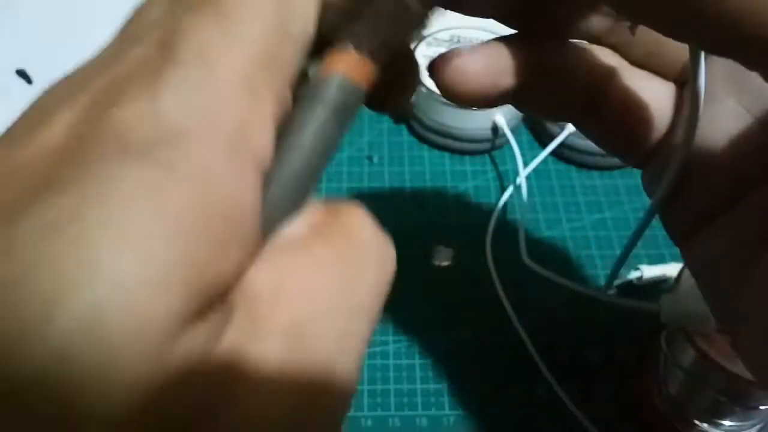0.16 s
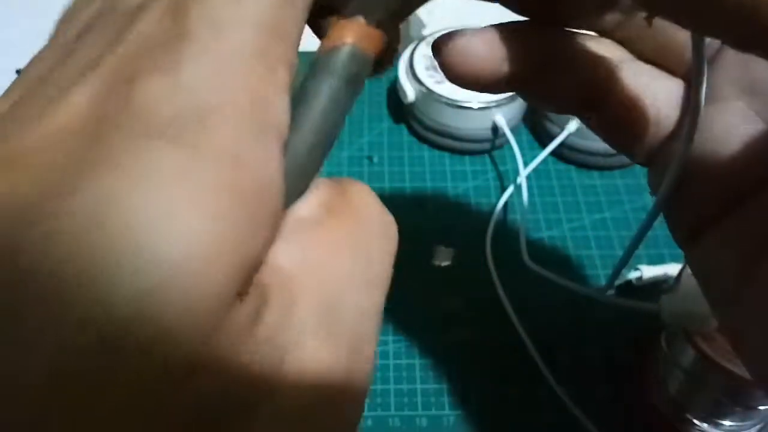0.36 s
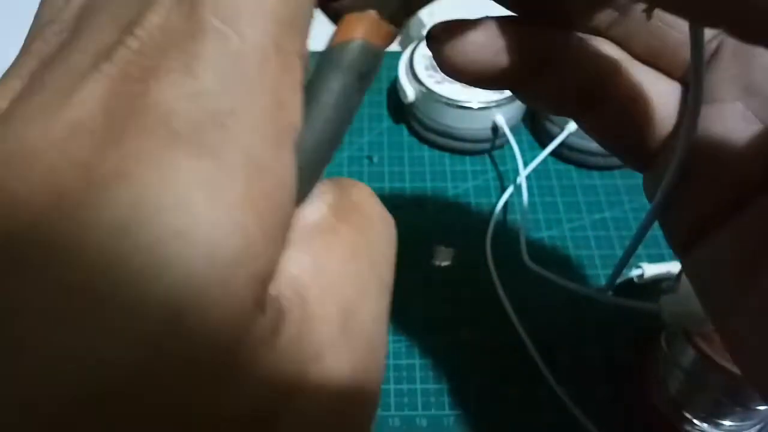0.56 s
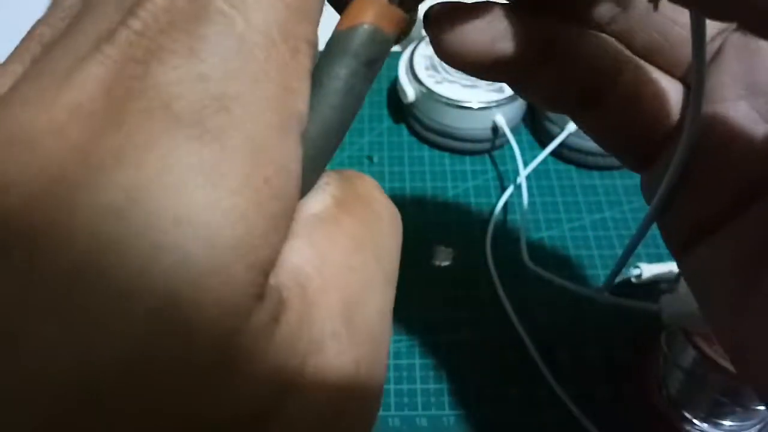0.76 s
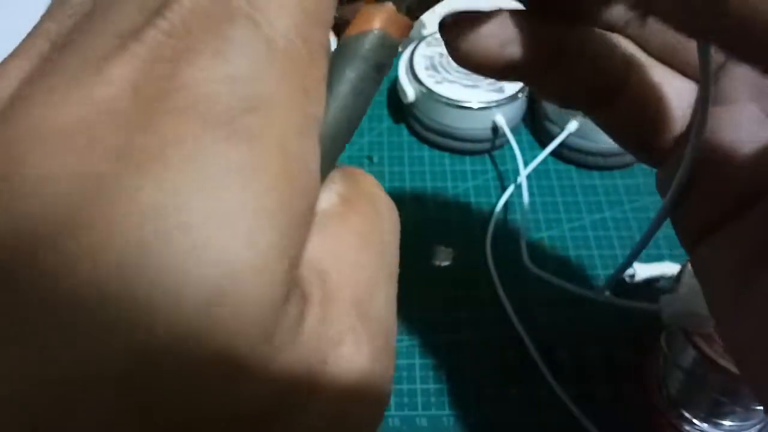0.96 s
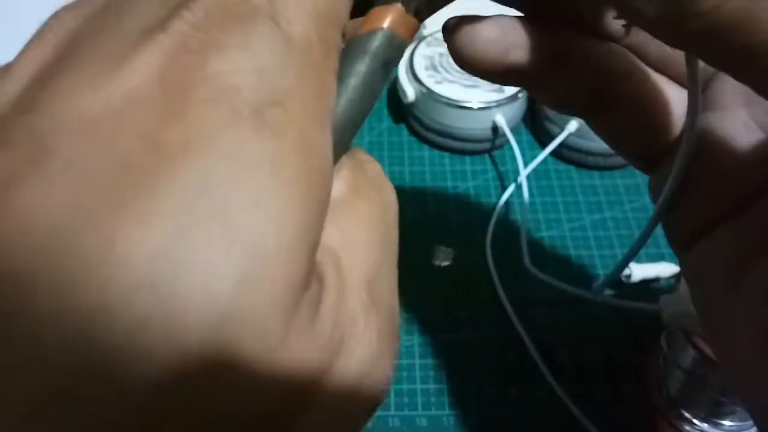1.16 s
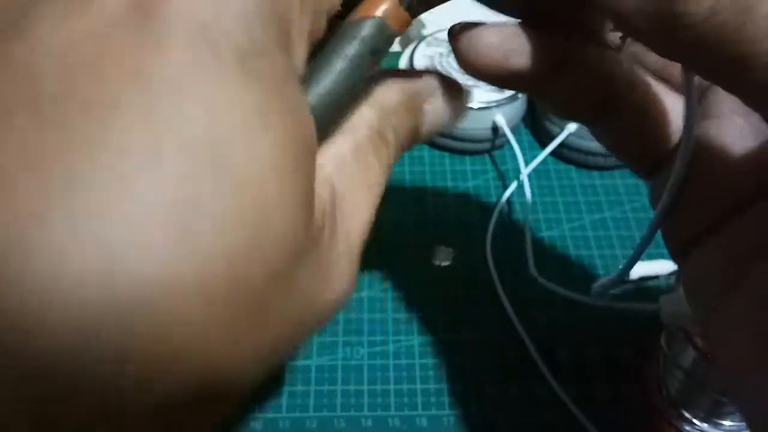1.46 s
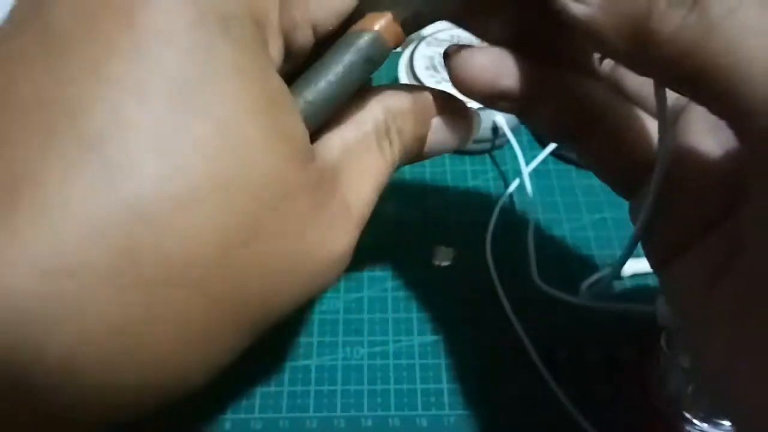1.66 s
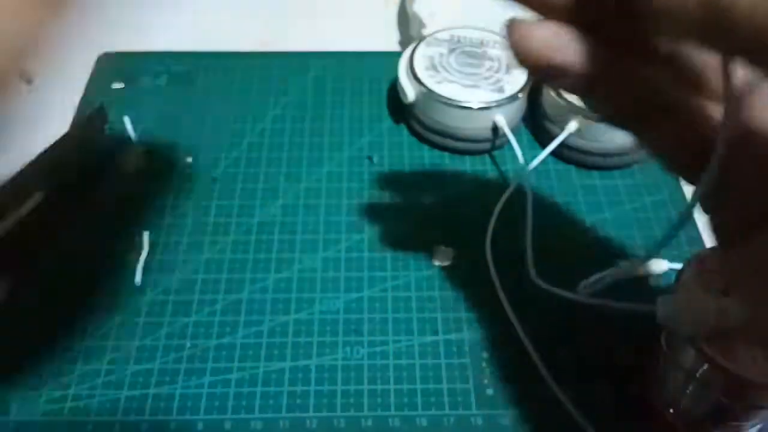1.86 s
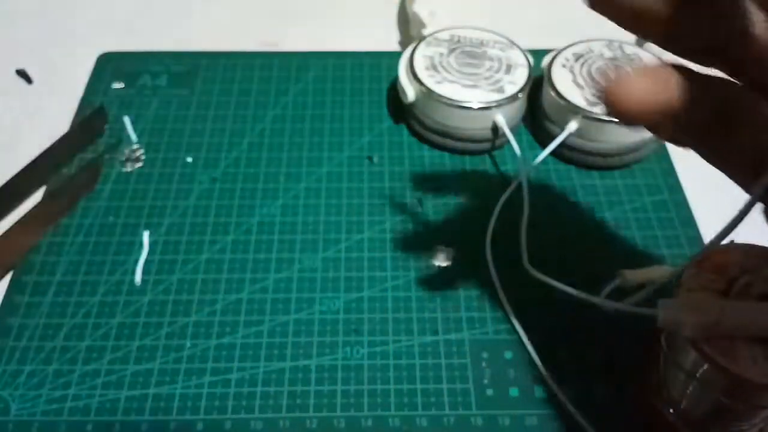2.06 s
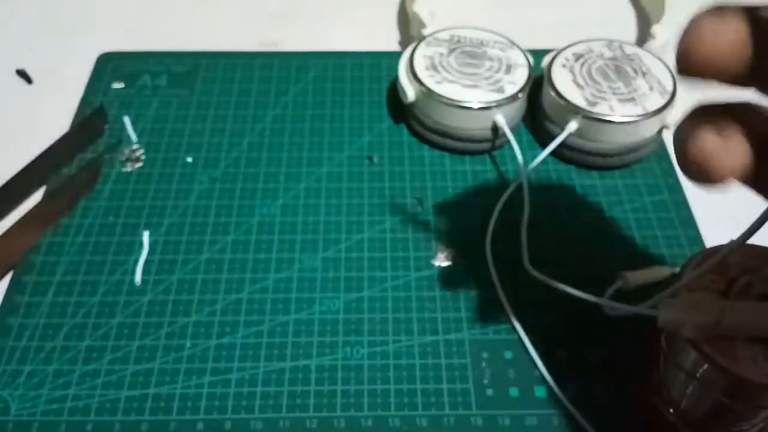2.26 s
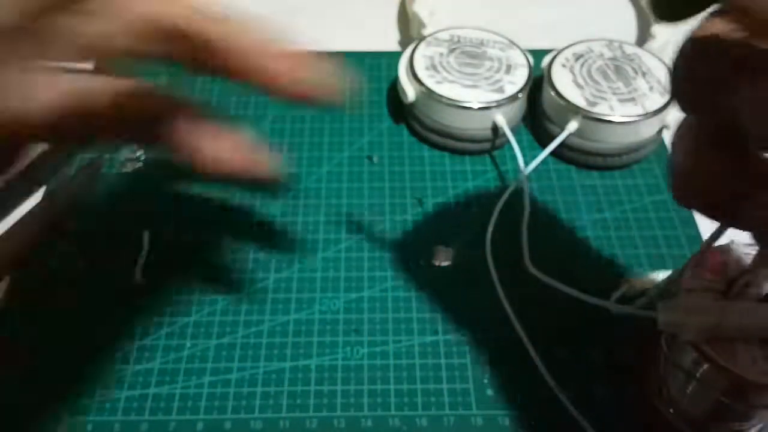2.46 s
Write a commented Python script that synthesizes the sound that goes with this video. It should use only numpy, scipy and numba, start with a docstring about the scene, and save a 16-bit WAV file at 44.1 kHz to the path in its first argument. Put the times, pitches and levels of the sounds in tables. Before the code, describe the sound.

A quick clatter of a soldering iron being set down follows a few dull hand bumps and a bright click. All is heard up close at a work table, over the steady hum and hiss of a small electric fan.

```python
"""A small electric fan hums and hisses beside a work table where hands handle a thin cable.
The hands bump the table softly and something small and hard clicks with a bright ring.
A soldering iron is put down with a short clatter: a quick run of blows that ring the table.
The close microphone's gain control ducks briefly on the sharp sounds."""
import sys
import numpy as np
from scipy import signal
from scipy.fft import rfft, irfft
from scipy.io import wavfile
from scipy.ndimage import uniform_filter1d
from numba import njit

SR = 44100
rng = np.random.default_rng(int(sys.argv[2]) if len(sys.argv) > 2 else 0)


def master(y):
    """Save y as 16-bit WAV."""
    cut = np.clip(np.atleast_2d(y).T, -1, 1)
    pcm = np.round(cut * 32767)  # scale
    wavfile.write(sys.argv[1], SR, pcm.astype(np.int16))


N = 114660


def amp(db):
    """Decibels to gain."""
    return 10 ** (np.asarray(db) / 20)


def unit(x):
    """Scale to standard deviation 1."""
    return x / np.std(x)


def noise(spectrum):
    """Noise of rms 1, shaped by (Hz, relative dB) points."""
    hz, db = np.array(spectrum).T
    bins_hz = np.maximum(np.fft.rfftfreq(N, 1 / SR), 1)
    shape = amp(np.interp(np.log(bins_hz), np.log(hz), db))
    return unit(irfft(rfft(rng.standard_normal(N)) * shape, N))


def wander(rate_hz):
    """Smooth random curve of standard deviation 1, changing about rate_hz times a second."""
    hold = int(SR / rate_hz)
    steps = np.repeat(rng.standard_normal(N // hold + 1), hold)
    return unit(uniform_filter1d(uniform_filter1d(steps, hold), hold)[:N])


def decay(t, t60_s):
    """Exponential fall of 60 dB in t60_s."""
    return np.exp(-np.log(1000) * t / t60_s)


def pulse(hz, length_s):
    """A few cycles that swell and die within length_s."""
    t = np.arange(int(length_s * SR)) / SR
    return -np.sin(2 * np.pi * hz * t) * np.sin(np.pi * t / length_s) ** 2


def highpass(x, hz):
    """Fourth-order low cut."""
    return signal.sosfilt(signal.butter(4, hz, "high", fs=SR, output="sos"), x)


def add(out, start_s, sound):
    """Mix sound into out at start_s."""
    i = int(start_s * SR)
    out[i:i + len(sound)] += sound[:N - i]


@njit
def follow(x, attack_s, release_s):
    """One-pole envelope follower with separate rise and fall times."""
    out, level = np.empty(len(x)), 0.
    for i in range(len(x)):
        level += (x[i] - level) / (SR * (attack_s if x[i] > level else release_s))
        out[i] = level
    return out


def fan(t):
    """Blade tone and weaker shaft harmonics over steady hiss and a low wavering drone."""
    # Each row: multiple of the shaft rate, rms level in dB. The blade tone is first.
    tones = [(7, -43.5), (8, -71.5), (12, -77), (14, -61), (16, -61.5), (20, -67), (24, -67.5), (28, -77.5),
             (35, -69)]
    # Each row: frequency in Hz, relative density in dB.
    hiss_spectrum = [(20, -15), (40, -11), (70, -9), (120, -2), (180, 2.5), (300, 5), (550, 0.5),
                     (700, -0.5), (850, 1), (1050, 0.5), (1150, 5), (1250, -3), (1380, 0.5), (1900, -3),
                     (2200, 3), (2450, -0.5), (3800, -1), (4300, 2), (5400, -4), (6650, -1.5),
                     (7500, -10.5), (8000, -16.5), (8900, -9), (9800, -3.5), (11600, -14.5), (12600, -17),
                     (13800, -19), (14800, -11), (15450, -7), (15700, -32)]
    # Each row: time in seconds, drone level in dB.
    drone_levels = [(0, -67), (.5, -60), (.75, -53), (1.05, -57), (1.5, -67.5), (2.0, -61.5), (2.6, -54)]
    shaft_hz = 55.87 * (1 + .00083 * wander(5.18))
    shaft_rad = 2 * np.pi * np.cumsum(shaft_hz) / SR
    out = amp(-48) * noise(hiss_spectrum)
    for k, (multiple, db) in enumerate(tones):
        waver_db = .5 * wander(17.2) if k == 0 else .7 * wander(5.4)
        phase_rad = multiple * shaft_rad + 2 * np.pi * rng.random()
        out += np.sqrt(2) * amp(db + waver_db) * np.sin(phase_rad)
    drone_hz = 130.2 + 7 * wander(29.44)
    drone_db = np.interp(t, *np.array(drone_levels).T) + 2 * wander(13)
    return out + amp(drone_db) * np.sin(2 * np.pi * np.cumsum(drone_hz) / SR)


def hands(t):
    """Hands slide and bump on the table: rumble and dull thuds through the cutting mat."""
    # Each row: frequency in Hz, relative density in dB.
    rumble_spectrum = [(20, -15), (50, 1), (100, 2.5), (200, -4), (400, -9), (1000, -49)]
    # Each row: time in seconds, rumble level in dB.
    rumble_levels = [(0, -67), (.09, -50), (.15, -55), (.3, -64), (.5, -62), (.95, -74), (1.15, -51),
                     (1.25, -71), (1.38, -58), (1.55, -72), (2.6, -73)]
    # Each row: start in seconds, level in dB, pitch in Hz, length in seconds.
    bumps = [(.0, -46, 248, 0.046), (0.046, -21.5, 116.5, 0.018), (0.07, -33, 98, 0.031),
             (.112, -38, 84, 0.057), (.185, -42.5, 129, 0.037), (0.25, -44, 346, 0.042),
             (.508, -41, 102, 0.02), (.538, -42, 80, .03), (1.117, -27.5, 114, 0.014),
             (1.305, -46.5, 119, 0.028), (1.803, -47, 104, 0.022)]
    out = noise(rumble_spectrum) * amp(np.interp(t, *np.array(rumble_levels).T))
    for start_s, db, hz, length_s in bumps:
        add(out, start_s, amp(db) * pulse(hz, length_s))
    return out


def small_part_clicks(t):
    """A small hard part snaps twice and rings, with a little room; each contact colours the click."""
    # Each row: start in seconds, gain in dB, most excited frequency in Hz.
    contacts = [(.1, -29, 8500), (1.682, 2.5, 6300), (1.8544, -12.5, 10900)]
    # Each row: frequency in Hz, relative level in dB, T60 in seconds.
    part_modes = [(2490, -33.5, 0.039), (2703, -25, 0.025), (2840, -39.5, 0.086), (5500, -27, 0.0055),
                  (7240, -18, 0.007), (7480, -30, 0.016), (9960, -19, 0.0066), (10900, -20, 0.0023),
                  (15000, -24, .008)]
    # Each row: frequency in Hz, relative density in dB.
    snap_spectrum = [(500, -46), (1700, -14), (2500, -8), (3500, -4), (5000, -6.5), (7100, -3), (8100, -6),
                     (10000, 4.5), (12000, -10), (13700, -6), (15200, -4), (16500, -8)]
    off_band_db, second_snap_s, second_snap_db = -5.5, .0006, -18
    out = np.zeros(N)
    ring = sum(amp(db) * np.sin(2 * np.pi * hz * t) * decay(t, t60_s) for hz, db, t60_s in part_modes)
    for start_s, db, contact_hz in contacts:
        grain = noise(snap_spectrum)
        snap = amp(-13.5) * grain[-len(t):] * decay(t, t60_s=.0035)
        room = amp(-32) * grain[:len(t)] * decay(t, t60_s=.08)
        click = ring + snap + room
        band = signal.lfilter(*signal.iirpeak(contact_hz, Q=2, fs=SR), click)
        add(out, start_s, amp(db) * (band + amp(off_band_db) * (click - band)))
        add(out, start_s + second_snap_s, amp(db + second_snap_db) * snap)
    return highpass(out, hz=2050)  # too small to radiate bass


def iron_clatter(t):
    """The iron settles: each blow cracks, knocks and rings the table; the rattle's treble dies first."""
    # Each row: start in seconds, gain in dB, crack offset in dB, knock offset in dB.
    blows = [(2.3476, 6.5, 3, -2.5), (2.3633, 3, -0.5, 2), (2.3658, 1, -4, -1), (2.372, -4.5, -7, 6),
             (2.3845, -10.5, 9, -13), (2.391, -7, 4, -2), (2.4093, 5.5, 0.5, 2), (2.459, -0.5, 6.5, -9),
             (2.4668, 4.5, 5.5, -1.5)]
    # Table with the iron on it. Each row: frequency in Hz, relative level in dB, T60 in seconds.
    table_modes = [(244.7, -26.5, 0.12), (318.3, -31.5, 0.14), (374, -35, 0.12), (504.6, -31.5, 0.075),
                   (600, -24.5, 0.091), (637, -45, 0.14), (765, -35, .07), (940, -30, 0.13),
                   (1106, -39, .04), (1450, -32.5, .06), (1555, -32, 0.037), (1995, -32.5, 0.041)]
    # Table rattle and contact crack. Each row: frequency in Hz, relative density in dB.
    rattle_spectrum = [(40, -15), (130, -3), (250, 4), (600, 4), (820, 0), (1200, 2.5), (1600, 2.5),
                       (2300, -10), (3800, -16), (6000, -23), (10000, -31), (13500, -36), (15200, -28),
                       (16000, -50)]
    crack_spectrum = [(300, -8), (1500, 8.5), (2800, 0.5), (4300, -6), (6500, -14.5), (7500, -17),
                      (10000, -12), (13500, -38), (15200, -11), (16500, -39)]
    rattle_db, crack_db, knock_db = -20, -24.5, -12
    split_hz, spread_s = 1180, .00066
    out = np.zeros(N)
    lowpass = signal.butter(2, split_hz, fs=SR, output="sos")
    spread = 1 - np.exp(-t / spread_s)  # the blow spreads through the table
    ring = sum((-1) ** k * amp(db) * np.sin(2 * np.pi * hz * t) * decay(t, t60_s)
               for k, (hz, db, t60_s) in enumerate(table_modes))
    for start_s, db, crack_offset_db, knock_offset_db in blows:
        grain = noise(rattle_spectrum)[:len(t)]
        low = signal.sosfiltfilt(lowpass, grain)
        rattle = low * decay(t, t60_s=.12) + (grain - low) * decay(t, t60_s=.079)
        crack = amp(crack_db + crack_offset_db) * noise(crack_spectrum)[:len(t)] * decay(t, t60_s=.016)
        body = highpass(spread * ring + crack, hz=157)  # the table radiates little below this
        knock = amp(knock_db + knock_offset_db) * pulse(hz=1294, length_s=.0025)
        add(out, start_s, amp(db) * (body + amp(rattle_db) * spread * rattle))
        add(out, start_s, amp(db) * knock)
    return out


def scene():
    """Fan, hands, clicks and clatter at one close microphone."""
    t = np.arange(N) / SR
    impact_t = t[:SR // 2]
    return (fan(t) + hands(t) + small_part_clicks(impact_t) + iron_clatter(impact_t))[None]


def record(dry):
    """Look-ahead gain control, then a steep treble cut."""
    threshold_db, ratio, look_ahead_s, top_hz = -23, 1.47, .0095, 15700
    envelope = follow(np.abs(dry[0]), attack_s=.00071, release_s=.017)
    ahead = np.interp(np.arange(N) + look_ahead_s * SR, np.arange(N), envelope)
    gain = np.maximum(ahead / amp(threshold_db), 1) ** (1 / ratio - 1)
    lowpass = signal.ellip(8, .2, 70, top_hz, fs=SR, output="sos")
    return signal.sosfilt(lowpass, dry * gain)


dry = scene()
out = record(dry)
master(out)
```